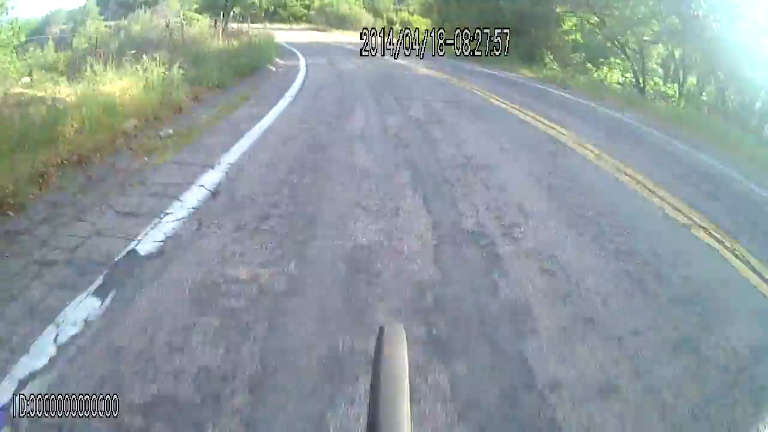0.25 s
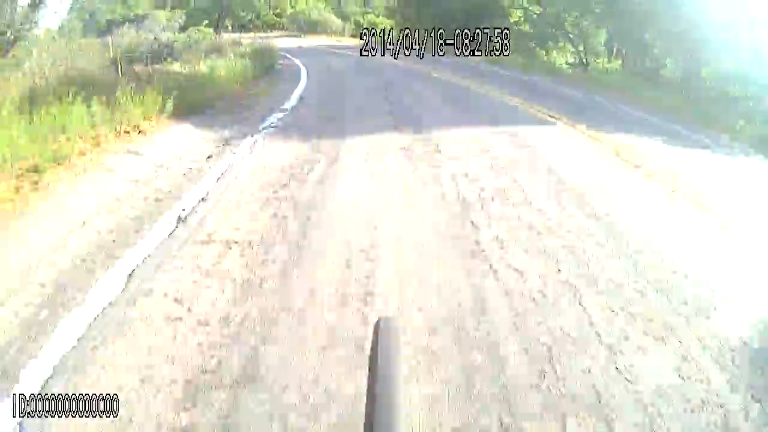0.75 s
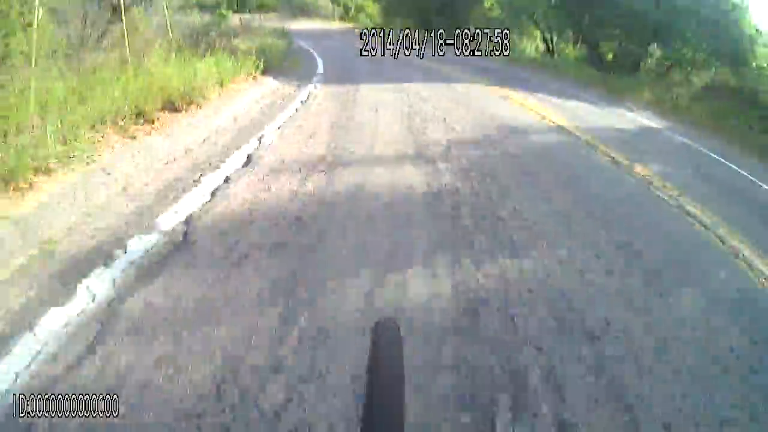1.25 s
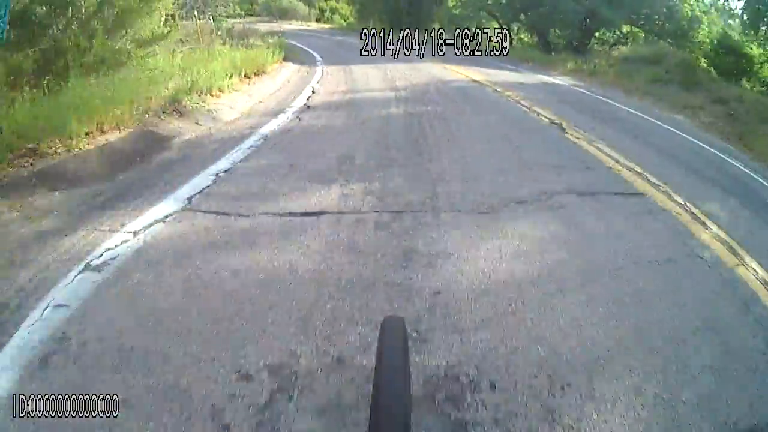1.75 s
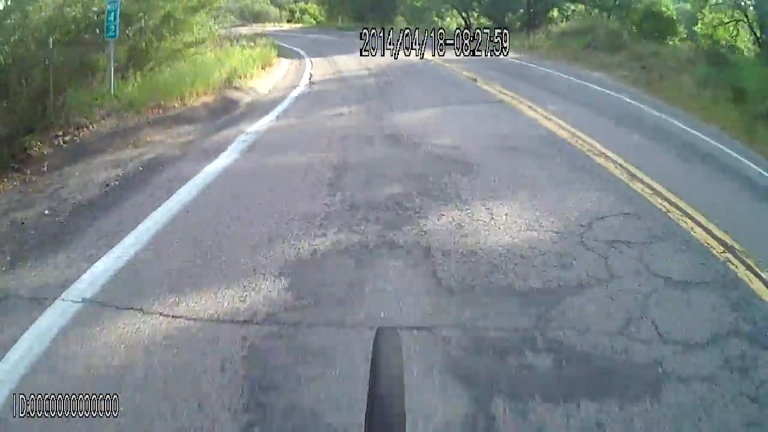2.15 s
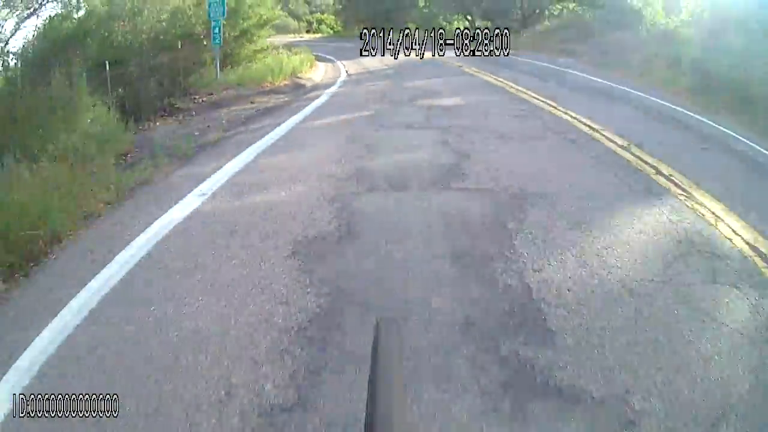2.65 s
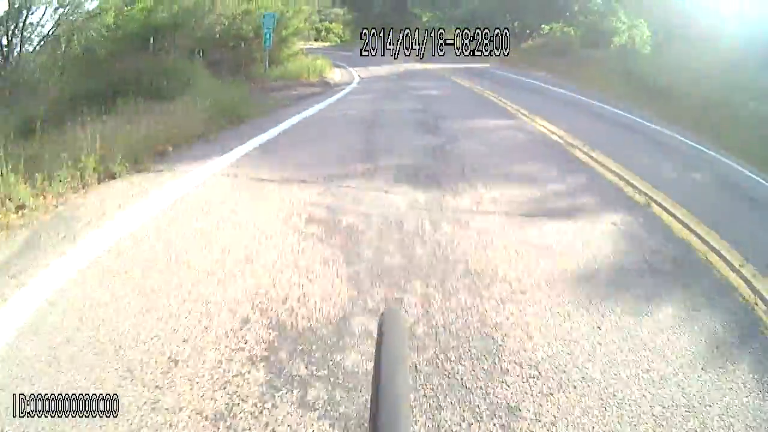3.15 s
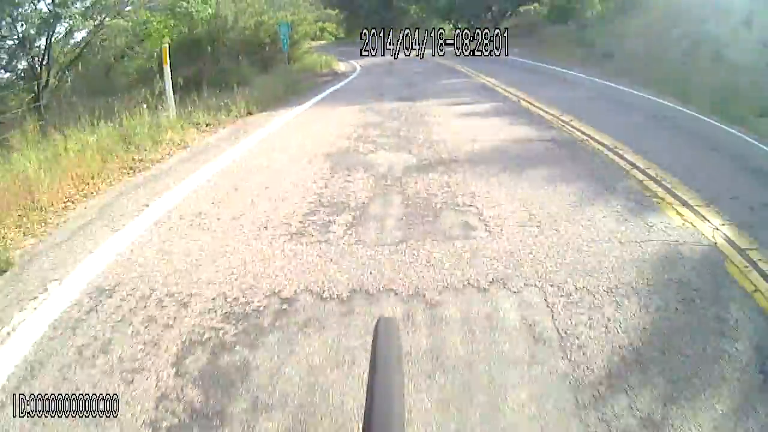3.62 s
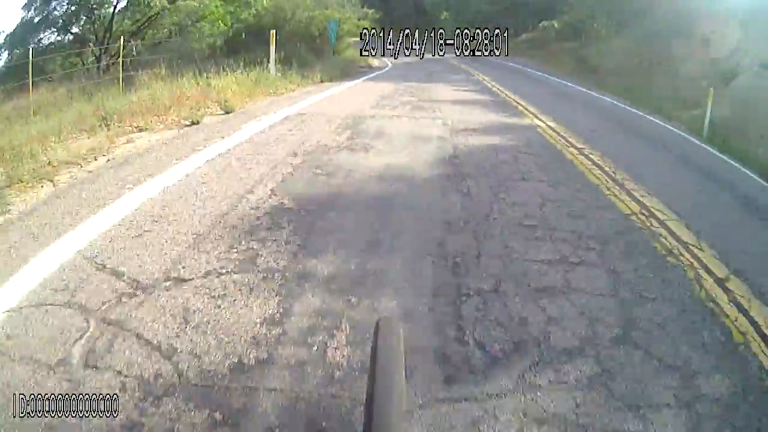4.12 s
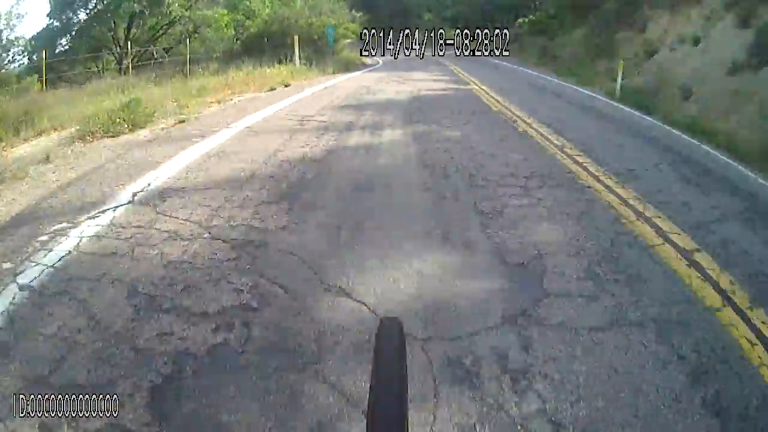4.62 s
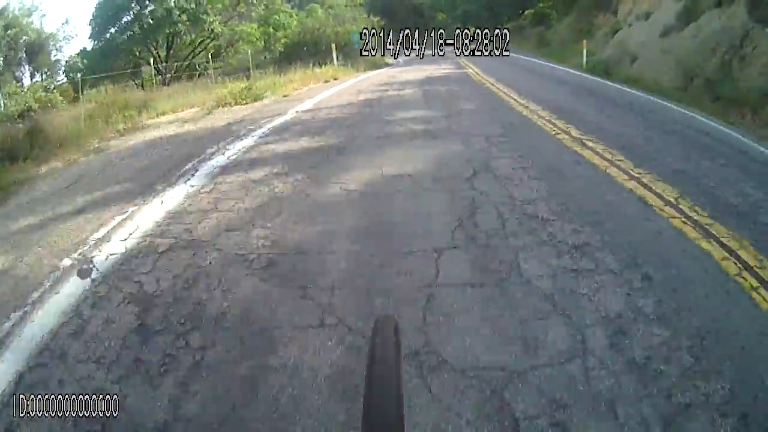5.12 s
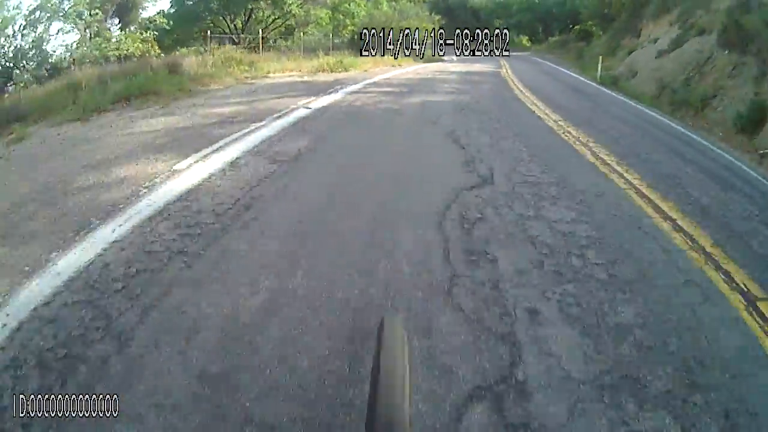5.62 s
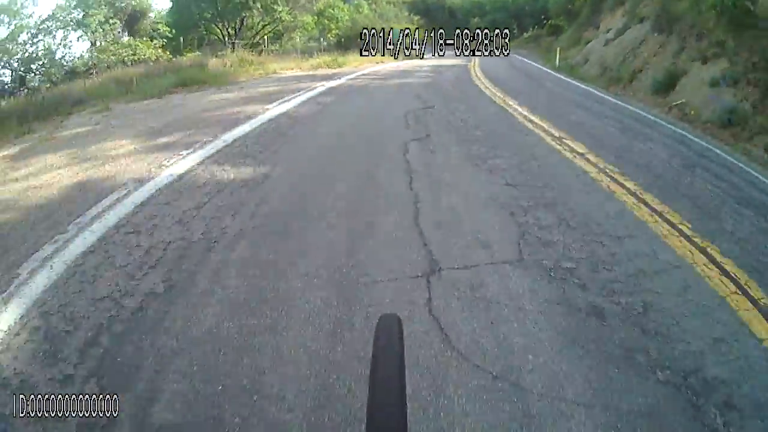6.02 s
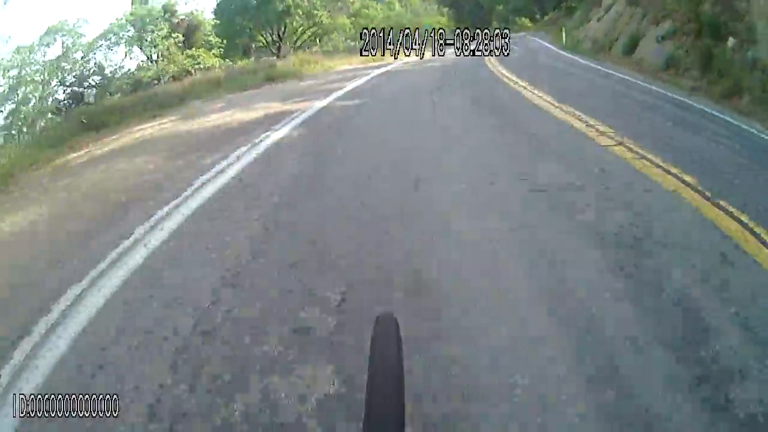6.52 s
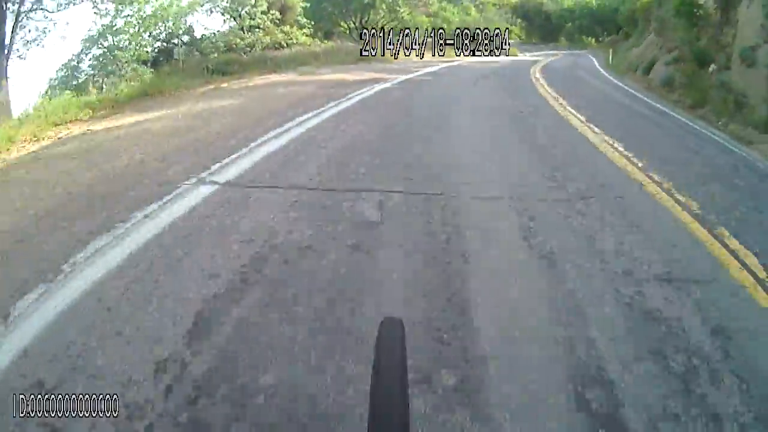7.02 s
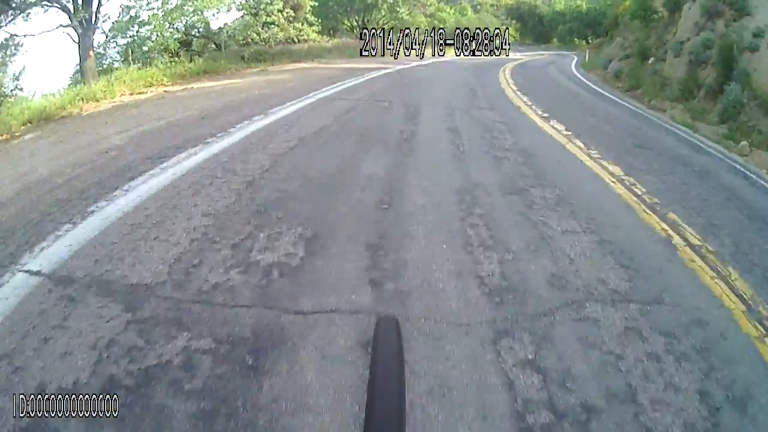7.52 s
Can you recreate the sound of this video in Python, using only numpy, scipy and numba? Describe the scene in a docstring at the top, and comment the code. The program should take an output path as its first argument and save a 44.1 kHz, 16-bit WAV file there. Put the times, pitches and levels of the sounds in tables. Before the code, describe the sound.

A bicycle rolls fast over cracked asphalt, heard from a small camera fixed to it. Wind rumbles and flutters on the microphone while the camera rattles against its mount in bursts of sharp, bright clicks and knocks. The rattling is densest in the first half, then comes in shorter, scattered bursts. A faint road hum and light crackle from the case run underneath.

```python
"""Camera rattling on a fast bicycle

A small camera rides over cracked asphalt while wind buffets its microphone and the road hums in the frame.
On rough stretches it chatters against its mount about 28 times a second: each blow knocks the housing
and rings a bright catch near 7.5 kHz. The case crackles, and now and then the mount creaks.
The camera's gain control ducks the wind after each strong blow and lets it swell back."""
import sys
import numpy as np
from scipy import signal
from scipy.fft import rfft, irfft
from scipy.io import wavfile
from numba import njit

SR = 44100
rng = np.random.default_rng(int(sys.argv[2]) if len(sys.argv) > 2 else 0)


def log_audio(samples):
    """Write samples as a 16-bit WAV file to the path given in sys.argv[1]."""
    # one column per channel
    frames = np.atleast_2d(samples).T
    # limit to full scale, then quantise
    limited = np.clip(frames, -1, 1)
    pcm = np.round(limited * 32767).astype(np.int16)
    wavfile.write(sys.argv[1], SR, pcm)


N = 342216


def undb(db):
    """Amplitude ratio of a level in decibels."""
    return 10 ** (np.asarray(db) / 20)


def unit(x):
    """Normalisation to rms 1."""
    return x / np.sqrt(np.mean(x ** 2))


def add(track, s, sound):
    """Superposition: a sound joins the track at s seconds."""
    i = int(np.clip(s * SR, 0, N - 1))
    track[i:i + len(sound)] += sound[:N - i]


def band(x, hz, width):
    """A second-order resonator with gain 1 at its centre."""
    return signal.lfilter(*signal.iirpeak(min(hz, .45 * SR), hz / width, fs=SR), x)


def lowpass(x, hz):
    """A second-order low-pass filter."""
    return signal.sosfilt(signal.butter(2, hz, fs=SR, output="sos"), x)


def noise(points):
    """Spectral shaping: noise of rms 1 whose spectrum follows (Hz, dB) points."""
    hz, db = np.transpose(points)
    bins = np.maximum(np.fft.rfftfreq(N, 1 / SR), 1)
    gain = undb(np.interp(np.log(bins), np.log(hz), db))
    return unit(irfft(rfft(rng.standard_normal(N)) * gain, N))


def walk(hz, samples=N):
    """Low-passed noise: smooth random motion of rms 1."""
    return unit(lowpass(rng.standard_normal(samples), hz))


def resonance(hz, width):
    """Random excitation of a steep-sided resonance, at rms 1."""
    return unit(band(band(rng.standard_normal(N), hz, width), hz, width))


def wind(split_hz=900, eddy_db=3.0, spurt_db=4.0):
    """Turbulence at the microphone port: eddies modulate a rumble, a spurting hiss and cavity tones."""
    # Level of the wind as heard: steady, but dipping around the heavier rattles.
    # Each row: time in seconds, level in dB.
    levels = [(0, -20), (.5, -9), (1.2, -10.5), (1.6, -12), (2.68, -9), (2.9, -12), (3.45, -12.5),
              (4.38, -9.5), (4.52, -16), (4.66, -11.5), (5.7, -12), (6.5, -9.5), (6.74, -20), (6.9, -10),
              (7.75, -12)]
    # The spectrum of the turbulence. Each row: frequency in Hz, relative spectral density in dB.
    spectrum = [(15, -6.5), (40, 1), (90, -2), (180, -9), (430, -12.5), (1050, -27), (1280, -32),
                (1900, -38), (2500, -42.5), (3700, -39), (5000, -49), (7500, -49), (11000, -64),
                (16000, -74)]
    # Cavities behind the port. Each row: centre in Hz, bandwidth in Hz, level in dB relative to the air.
    hollows = [(491, 220, -13.5), (1548, 310, -20.5), (3176, 160, -36.5), (3740, 120, -39)]
    level_db = np.interp(np.arange(N) / SR, *np.transpose(levels))
    air = noise(spectrum)
    rumble = signal.sosfiltfilt(signal.butter(2, split_hz, fs=SR, output="sos"), air)
    tones = sum(undb(db) * resonance(hz, width) for hz, width, db in hollows)
    eddies = undb(eddy_db * walk(hz=24.2))
    hiss = unit(undb(spurt_db * walk(hz=230))) * (air - rumble)
    return unit(eddies * (rumble + hiss + tones)) * undb(level_db)


def road(frame_db=-27, tyre_db=-40):
    """Forced vibration: coarse asphalt hums in the frame and roars under the tyres."""
    return undb(frame_db) * resonance(484.7, 64) + undb(tyre_db) * resonance(1130, 990)


def crackle(per_s=220, spread_db=8.0, flare_db=4, flare_hz=9):
    """Impulse excitation: road vibration causes tiny slips, mostly faint, that ring the case."""
    # Resonances of the case. Each row: centre in Hz, bandwidth in Hz, level in dB.
    case_modes = [(1760, 330, -37), (3360, 1200, -49), (6970, 1400, -45.5), (10850, 760, -55)]
    when, size = rng.random((int(per_s * N / SR), 2)).T
    onsets = (when * N).astype(int)
    strength = undb(np.minimum(-spread_db * np.log(1 - size), 20))
    strength *= undb(flare_db * walk(flare_hz))[onsets]  # slips flare on coarser asphalt
    out = np.zeros(N)
    for hz, width, db in case_modes:
        slips = np.bincount(onsets, strength * rng.standard_normal(len(onsets)), N)
        out += undb(db) * unit(band(band(slips, hz, width), hz, width))
    return out


def blows(stray_s=.0005, scatter_db=3.34):
    """Impacts forced by the road, single or nearly periodic, each as (seconds, ring dB, knock dB)."""
    # Lone bumps. Each row: time in seconds, ring level in dB, knock in dB relative to the ring.
    bumps = [(.064, -3, -14), (.0848, -15.5, 8), (1.5381, -11, 6.5), (1.7133, 6.5, -8.5), (1.87, 4, -7),
             (1.9378, 12.5, -6), (2.0359, 5, -9), (2.2883, -3, -0.5), (3.3048, 4, -7.5), (3.6525, -18, 2.5),
             (3.9569, 4, -6), (4.5983, -17.5, 4), (4.7306, -5, -2), (4.8437, 8, -17), (4.869, -9.5, 8),
             (5.0293, -0.5, -13), (5.0744, 4, -9), (6.009, -24.5, 11), (6.3358, -11, -19),
             (6.7184, 5.5, -5.5), (7.215, 3.5, -12)]
    # Chatter on rough stretches. Each row: first and last blow in seconds, number of blows,
    # first and last ring level in dB, knock in dB relative to the ring.
    chatter = [(.0025, 0.033, 2, -8.5, -15, -7.5), (0.1205, 0.1483, 2, -1, -6, -2.5),
               (.216, 0.2383, 2, -6, -16, 3), (0.278, .308, 2, -1, -2, -10), (0.76, 0.7862, 2, -1, -1, -23),
               (0.891, 0.9775, 4, -11, -0.5, -5), (1.106, 1.3073, 7, 12.5, 2.5, -6.5),
               (1.335, 1.3936, 3, 3.5, -6, -1.5), (1.4145, 1.4472, 2, 3, 5.5, -2.5),
               (1.5748, 1.604, 2, 4, 2, -17), (1.7967, 1.824, 2, -1, 0.5, -3.5),
               (2.0783, 2.1848, 4, 9.5, 11, -7), (2.2367, 2.267, 2, -1.5, -2, -24),
               (2.761, 2.807, 2, 10, 11, -7.5), (2.8465, 2.914, 3, 6.5, 7, -7),
               (2.9522, 2.986, 2, 7, 3, -3), (3.0253, 3.13, 4, 8.5, 0.5, -3),
               (3.1686, 3.275, 4, 3, 3, -5.5), (3.348, 3.406, 3, 8.5, 5.5, -7),
               (3.5107, 3.5683, 3, 8, 2.5, -7.5), (4.429, 4.5477, 4, 8, 4.5, -5),
               (4.941, 5.004, 3, 14, -2, -7), (5.692, 5.7156, 2, -1, -6.5, -5),
               (5.7704, 5.8362, 3, 3, 5, -4), (6.1191, 6.2234, 4, 7.5, 5, -8.5),
               (6.573, 6.679, 3, 2, 9.5, -7), (7.236, 7.29, 3, 2, -6.5, 2.5)]
    out = list(bumps)
    for start, end, count, first_db, last_db, knock_db in chatter:
        for part in np.linspace(0, 1, count):
            stray, scatter = rng.standard_normal(2)
            s = start + part * (end - start) + stray_s * stray
            db = first_db + part * (last_db - first_db) + scatter_db * scatter
            out.append((s, db, knock_db))
    return out


def knock(t, touch_s=0.00023, grain=0.15):
    """Modal decay: a tap with a grainy tail rings the housing, landing a little elsewhere each time."""
    # Modes of the housing. Each row: frequency in Hz, level in dB, time to decay by 60 dB in seconds.
    housing = [(790, -19, 0.014), (1040, -5, 0.009), (1560, 3.5, 0.01), (2330, -9, 0.018),
               (3133, -11.5, 0.024), (3820, -12, 0.016), (5100, -15.5, 0.024), (9630, -0.5, 0.0028),
               (13100, -13, 0.0041), (15700, -19, 0.004)]
    mode_hz, mode_db, t60 = np.transpose(housing)[:, :, None]
    detune, phase = rng.standard_normal((len(housing), 2)).T[:, :, None]
    cycles = mode_hz * (1 + 0.039 * detune) * t + phase
    modes = undb(mode_db) * np.sin(2 * np.pi * cycles) * np.exp(-np.log(1000) * t / t60)
    clean = modes.sum(axis=0) * (1 - np.exp(-t / 0.00037))
    force = (t == 0) + grain * rng.standard_normal(len(t)) * np.exp(-t / touch_s)
    rough = signal.fftconvolve(clean, force)[:len(t)]
    return unit(rough) * clean.std()


def contact(knock_db, ring_hz=7760, sag_hz=520, settle_s=0.0015, rise_s=0.00071, fade_s=0.0016,
            twin_hz=7120, twin_db=-9, scrape_db=-17):
    """Impact: the catch rings, lower in pitch while pressed; the housing knocks and the faces scrape."""
    t = np.arange(SR // 30) / SR
    grip = 1 + 0.02 * rng.standard_normal()  # the catch never seats twice alike
    hz = grip * (ring_hz - sag_hz * np.exp(-t / settle_s))
    glance = undb(-.35 * knock_db)  # a glancing touch hardly knocks and swells more slowly
    swell = (1 - np.exp(-t / (rise_s * glance))) ** 2 * np.exp(-t / fade_s)
    swell /= swell.max()
    phase = 2 * np.pi * np.cumsum(hz) / SR + 0.36 * walk(620, len(t))
    twin = undb(twin_db) * np.sin(2 * np.pi * (grip * twin_hz * t + rng.random()))
    ring = swell * (np.sin(phase) + twin)
    friction = unit(band(rng.standard_normal(len(t)), 6760, 2650))
    scrape = friction * np.sqrt(swell) * np.exp(-t / 0.0093)  # lasts while the faces touch
    return ring + undb(knock_db) * knock(t) + undb(scrape_db) * scrape


def rattle(rebound_s=.0055, rebound_slope=0.62, rebound_knock_db=-10, glancing_db=-5, glancing_loss=1.9):
    """Elastic rebound: each blow strikes again milliseconds later; glancing blows hardly rebound."""
    out = np.zeros(N)
    for s, db, knock_db in blows():
        rebound_db = rebound_slope * db - glancing_loss * max(glancing_db - knock_db, 0)
        flight_s = rebound_s * (1 + 0.48 * rng.uniform(-1, 1))
        add(out, s, undb(db) * contact(knock_db))
        add(out, s + flight_s, undb(rebound_db) * contact(knock_db + rebound_knock_db))
    return out


def jiggle(per_s=12, tick_db=-25, spread_db=12, knock_db=-5):
    """Mechanical play: the loose catch ticks faintly at random times."""
    out = np.zeros(N)
    for when, size in rng.random((int(per_s * N / SR), 2)):
        add(out, when * N / SR, undb(tick_db + spread_db * (size - .5)) * contact(knock_db))
    return out


def creaks(rise_s=0.0031, octave_db=-11):
    """Stick-slip friction: the mount slips in its clamp with a brief, rough squeak and its octave."""
    # Slips of the mount. Each row: start in seconds, pitch in Hz, level in dB.
    slips = [(.892, 2060, -9), (6.753, 1910, -3.5), (6.805, 1850, -11), (7.449, 2230, -12)]
    out, t = np.zeros(N), np.arange(SR // 30) / SR
    swell = (t / rise_s * np.exp(1 - t / rise_s)) ** 2
    for s, hz, db in slips:
        phase = 2 * np.pi * hz * t + .8 * walk(500, len(t))
        add(out, s, undb(db) * swell * (np.sin(phase) + undb(octave_db) * np.sin(2 * phase)))
    return out


@njit
def follow(x, attack, release):
    """Exponential smoothing of an envelope; attack and release are time constants in seconds."""
    out, level = np.empty(len(x)), 0.
    for i in range(len(x)):
        level += (x[i] - level) / (SR * (attack if x[i] > level else release))
        out[i] = level
    return out


def gain_control(x, threshold_db=-19, attack_s=0.00036, release_s=0.017, lag_s=0.0026):
    """Compression: the gain falls, a little late, as a mostly treble envelope exceeds the threshold."""
    sidechain = band(x, 5270, 5970) + undb(-16.0) * x
    envelope = follow(np.abs(sidechain), attack_s, release_s)
    cut_db = np.maximum(20 * np.log10(envelope + 1e-9) - threshold_db, 0)
    return x * undb(-follow(cut_db, lag_s, lag_s))


def scene():
    """Superposition of all sources at the microphone, in one channel."""
    return (rattle() + jiggle() + crackle() + creaks() + wind() + road())[None]


def record(dry, whine_hz=2116, whine_db=-51.5, top_hz=15350):
    """Overload: hard blows outrun the gain control and clip before a low-pass; a thin whine lies behind."""
    ducked = gain_control(dry[0])
    whine = undb(whine_db) * resonance(whine_hz, width=28)
    clipped = np.clip(ducked + whine, -1, 1)
    return signal.sosfilt(signal.ellip(8, .2, 70, top_hz, fs=SR, output="sos"), clipped)[None]


dry = scene()
out = record(dry)
log_audio(out)
```